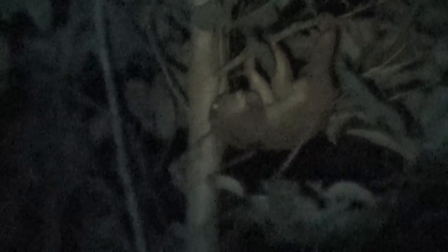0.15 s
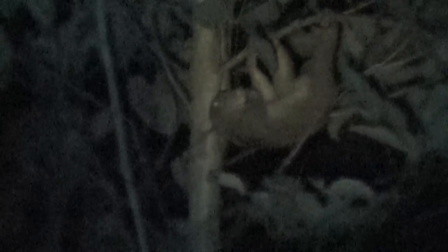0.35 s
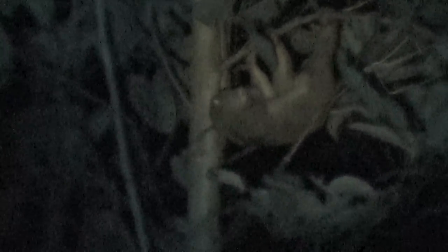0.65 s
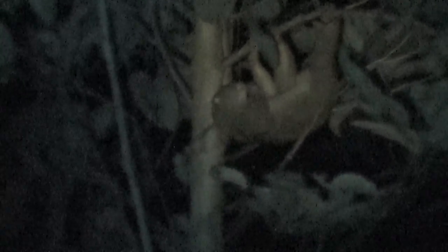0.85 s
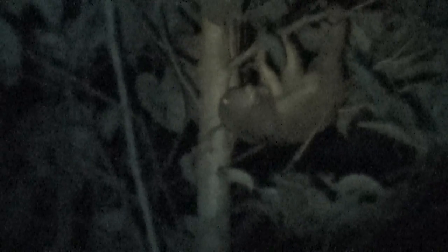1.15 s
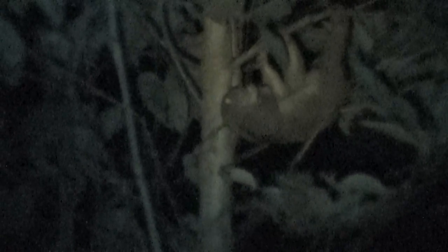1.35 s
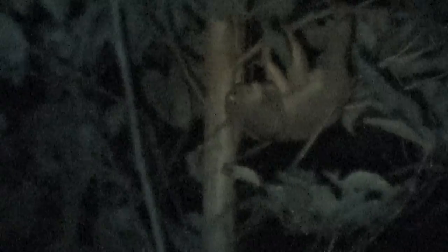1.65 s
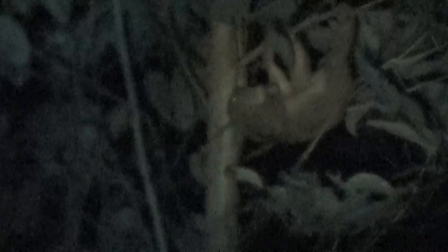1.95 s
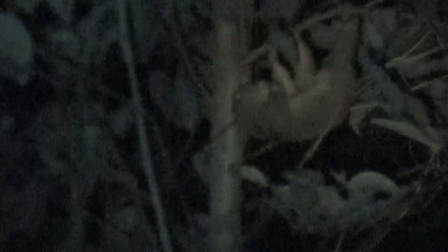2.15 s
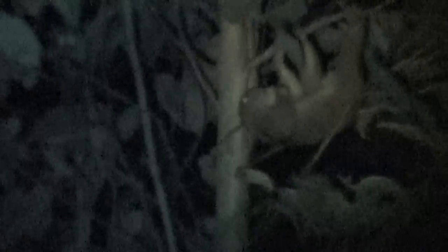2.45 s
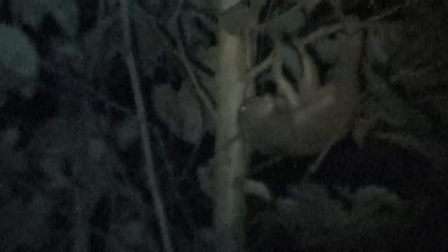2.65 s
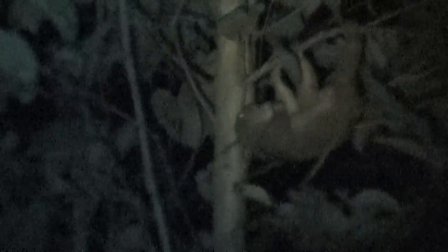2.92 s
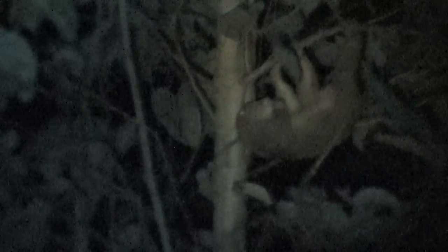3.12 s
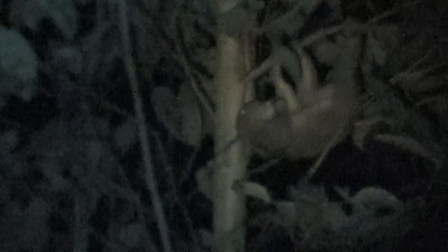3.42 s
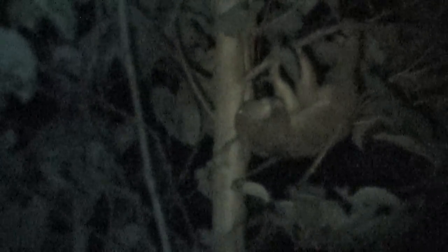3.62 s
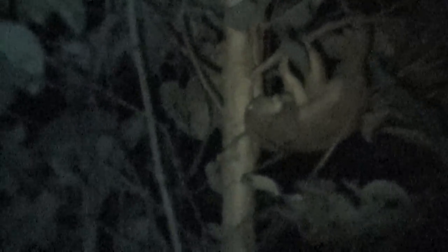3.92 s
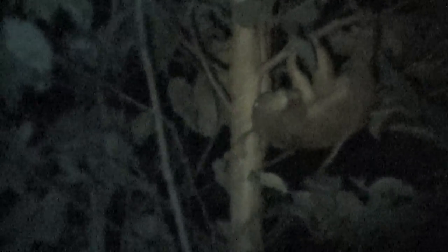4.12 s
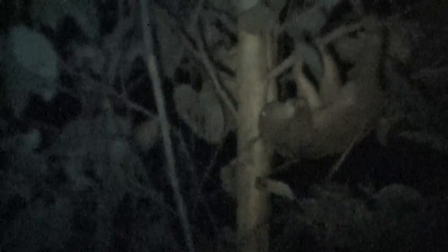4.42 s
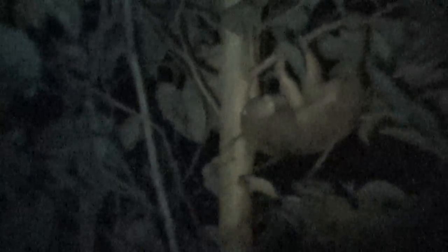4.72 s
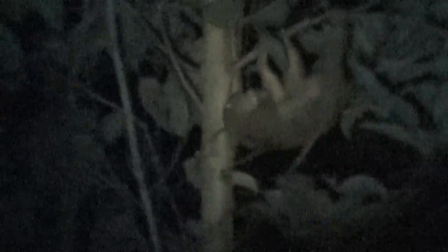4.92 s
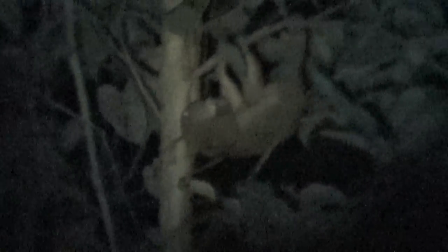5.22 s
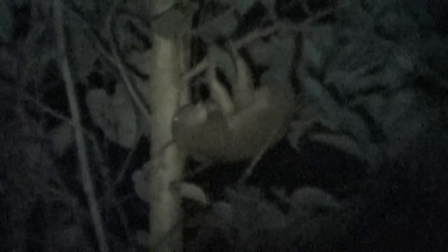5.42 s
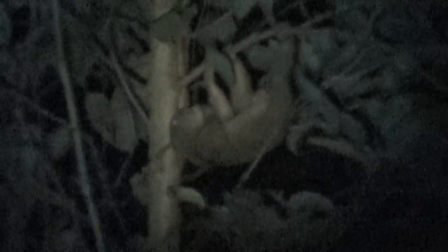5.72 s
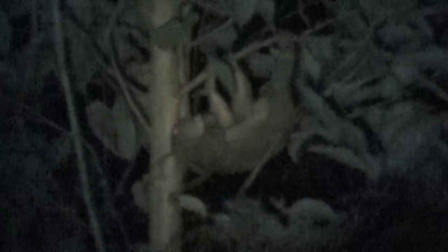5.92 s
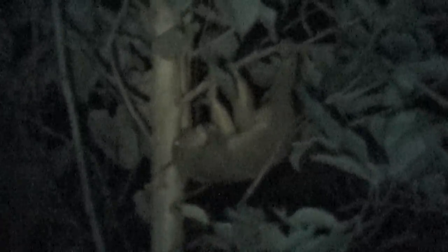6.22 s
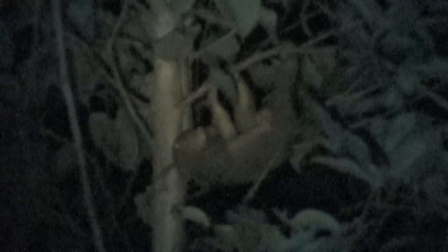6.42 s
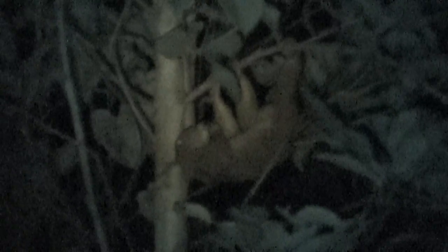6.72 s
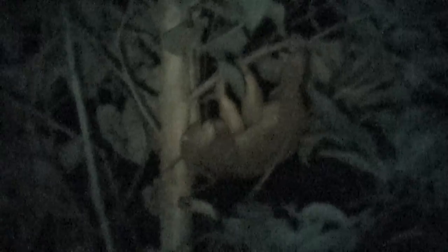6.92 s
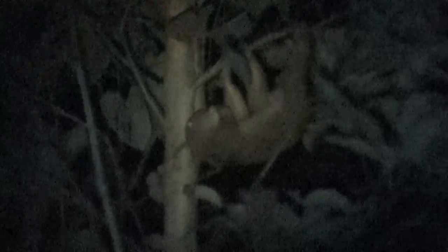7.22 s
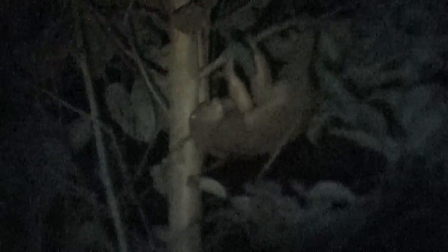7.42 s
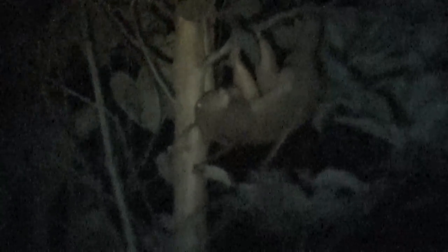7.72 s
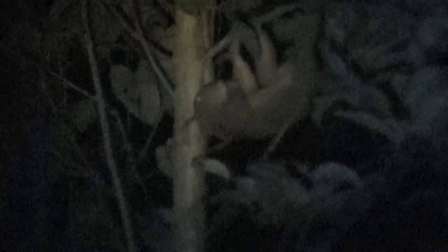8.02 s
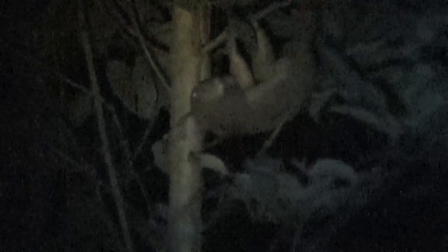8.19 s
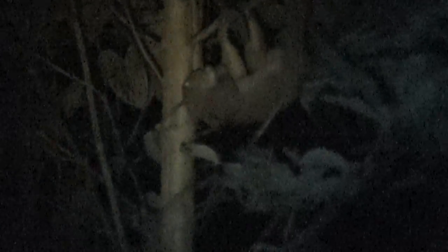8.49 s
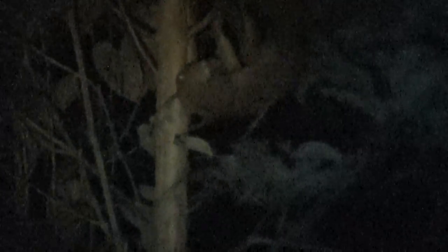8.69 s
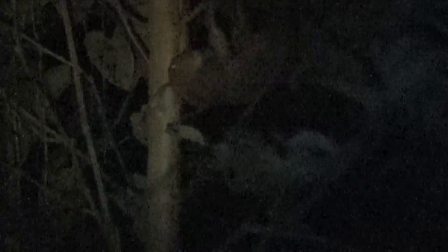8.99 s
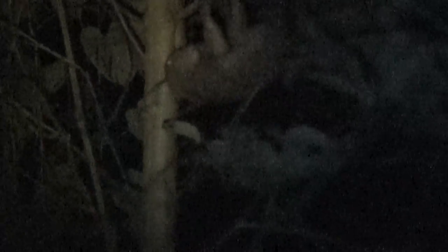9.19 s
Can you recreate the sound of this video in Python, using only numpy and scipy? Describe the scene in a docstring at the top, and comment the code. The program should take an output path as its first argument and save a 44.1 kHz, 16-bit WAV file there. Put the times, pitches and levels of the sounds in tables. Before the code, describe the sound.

Night rainforest: clear high frog peeps and quick two-part whistles from left and right, above layered cricket trills and fine insect rasping.

```python
"""Tropical forest at night

Small frogs peep in bouts and give two-part whistles, made of near sines that glide in pitch.
A near cricket trills with short pauses, one further off never stops, and two more buzz and rest.
A high katydid rasps in shaped noise, thin insects tick and chirp, and far frogs whistle softly.
Throbbing noise bands make the distant chorus, over faint air; trunks and leaves scatter many calls."""
import sys
import numpy as np
from scipy import signal
from scipy.fft import rfft, irfft, next_fast_len
from scipy.io import wavfile

SR = 44100
rng = np.random.default_rng(int(sys.argv[2]) if len(sys.argv) > 2 else 0)


def materialize(psi):
    """Save the field psi as 16-bit PCM at rate SR to the path in sys.argv[1].

    A 1-D psi becomes a single channel; in a 2-D psi each row is a channel.
    """
    bounded = np.clip(np.atleast_2d(psi).T, -1, 1)
    quanta = np.round(bounded * 32767).astype(np.int16)
    wavfile.write(sys.argv[1], SR, quanta)


N = 412335


def undb(db):
    """Turn decibels into a gain."""
    return 10 ** (np.asarray(db) / 20)


def level(x, db):
    """Scale a sound to an average (rms) level in dB."""
    return x * undb(db) / np.sqrt(np.mean(x ** 2))


def clock(seconds=None):
    """Sample times of a short sound, or of the whole scene."""
    return np.arange(N if seconds is None else int(seconds * SR)) / SR


def pan(db):
    """Left and right gains that differ by this many dB; above zero is left."""
    return undb(np.array([[db], [-db]]) / 2)


def add(out, s, x):
    """Mix a sound in, starting at s seconds."""
    i = int(s * SR)
    a, b = max(i, 0), min(i + x.shape[-1], N)
    if b > a:
        out[..., a:b] += x[..., a - i:b - i]


def walk(rate):
    """Random drift with a spread near 1, through `rate` new points per second."""
    points = rng.standard_normal(1024)
    # joining points by straight lines shrinks the spread; the factor restores it
    return np.sqrt(1.5) * np.interp(clock() * rate, np.arange(len(points)), points)


def noise(gain, side_db, comb_db=1.9):
    """Stereo noise shaped by gain(Hz), with a fixed random ripple that is deepest in the treble."""
    size = next_fast_len(N, True)
    f = np.arange(size // 2 + 1) * SR / size
    teeth = np.linspace(0, SR / 2, 700)
    ripple = np.interp(f, teeth, rng.standard_normal(len(teeth)))
    comb = undb(comb_db * f / 6000 * ripple)
    spectrum = rfft(rng.standard_normal((2, size))) * gain(f) * comb
    mid, side = irfft(spectrum, size)[:, :N]
    return level(mid + undb(side_db) * side * np.array([[1], [-1]]), 0)


def bell(hz, spread_hz):
    """A bell-shaped band around one pitch."""
    return lambda f: np.exp(-((f - hz) / (2 * spread_hz)) ** 2)


def colour(points):
    """A spectrum drawn through (frequency, level) points."""
    hz, db = np.transpose(points)
    return lambda f: undb(np.interp(np.log(f + 1), np.log(hz), db, left=-90, right=-90))


def swell(u, attack, release):
    """Smooth rise and fall while u runs from 0 to 1."""
    return np.sin(np.pi / 2 * np.clip(np.minimum(u / attack, (1 - u) / release), 0, 1)) ** 2


def whistle(hz, overtone_db):
    """A near sine that follows a pitch curve, with a weak octave above."""
    phase = 2 * np.pi * np.cumsum(hz) / SR
    return np.sin(phase) + undb(overtone_db) * np.sin(2 * phase)


def forest(x, t60, side_db):
    """Dense scatter from trunks and leaves: a noisy echo that builds up, then falls 60 dB in t60 s."""
    t = clock(1)
    fade = np.exp(-np.log(1000) * t / t60) * (1 - np.exp(-t / .012))
    mid, side = rng.standard_normal((2, len(t))) * fade
    echo = mid + undb(side_db) * side * np.array([[1], [-1]])
    unit_echo = echo / np.sqrt(np.sum(echo ** 2) / 2)
    return signal.fftconvolve(x[None], unit_echo, axes=1)[:, :N]


def peep(hz, length, rise_hz=62, crest=0.72):
    """One note that starts briskly, arches up to its pitch and flutters a little in level."""
    u = clock(length) / length
    flutter = undb(.8 * np.interp(u, np.linspace(0, 1, 12), rng.standard_normal(12)))
    shape = swell(u, attack=.19, release=.24) * flutter
    return whistle(hz - rise_hz * (1 - u / crest) ** 2, overtone_db=-29.5) * shape


# the peeping frogs, by name: (warm pitch [Hz], warm level [dB], warm peep length [s],
# left minus right [dB])
FROGS = {"high": (4461, -23.7, 0.0831, 6.5), "right": (4341, -23.6, .097, -6),
         "left": (4303, -28.7, 0.0953, 8), "far right": (4343, -27.6, .1, -9.5),
         "far": (4432, -30.5, .1, -1), "farthest": (4440, -38.5, .09, -1)}
# bouts of peeps: (frog name, cold at the start [0-1], list of peep times [s])
BOUTS = [("far right", 0, [.076, .355]), ("high", .3, [.186, .484]), ("farthest", 0, [.784, 1.065]),
         ("far", .7, [1.856, 2.145, 2.403, 2.652]), ("left", .7, [2.261, 2.575, 2.868, 3.137, 3.413]),
         ("high", 0.49, [2.468, 2.775, 3.062, 3.386, 3.715]), ("right", .9, [4.005, 4.298, 4.592, 4.884]),
         ("far", 0, [5.214, 5.472, 5.734]), ("high", 0.93, [5.645, 5.911, 6.192, 6.484, 6.838]),
         ("right", .3, [6.803, 7.129, 7.434, 7.718, 7.993]), ("far", .5, [7.93, 8.281, 8.551, 8.818]),
         ("left", .2, [8.355, 8.604, 8.9, 9.163]), ("high", 0.68, [8.909, 9.247])]
# a cold frog calls lower, softer and shorter (as a share); each peep leaves a share of the cold
COLD_HZ, COLD_DB, COLD_SHORTER, COLD_LEFT = 85, -5, 0.38, 0.21
# a soft, lower lead-in comes before every peep
LEAD_S, LEAD_LENGTH_S, LEAD_DROP_HZ, LEAD_DB = .04, .055, 70, -16


def peeping_frogs(near_db=-23, leaves_db=-14, echo_db=-23, wet_slope=1.4):
    """Each frog warms up through a bout; the softer it is, the more leaves scatter its call."""
    direct, scattered = np.zeros((2, N)), np.zeros(N)
    for frog, cold, onsets in BOUTS:
        hz, db, length, pan_db = FROGS[frog]
        wet = undb(min(leaves_db + wet_slope * (near_db - db), 0))
        for s in onsets:
            pitch = hz - COLD_HZ * cold
            # direct and scattered sound share the call's power
            gain = undb(db + COLD_DB * cold) / np.hypot(1, wet)
            lead = peep(pitch - LEAD_DROP_HZ, LEAD_LENGTH_S) * undb(LEAD_DB)
            main = peep(pitch, length * (1 - COLD_SHORTER * cold))
            for start, note in ((s - LEAD_S, lead), (s, main)):
                add(direct, start, note * gain * pan(pan_db))
                add(scattered, start, note * gain * wet)
            cold *= COLD_LEFT
    leaves = forest(scattered, t60=0.23, side_db=-15)
    echo = undb(echo_db) * forest(direct.mean(axis=0), t60=0.19, side_db=-12)
    return direct + leaves + echo


# runs of a frog whose whistle steps up partway: (first call [s], last call [s], level [dB])
TWO_PART_RUNS = [(.335, 1.682, -35.5), (1.926, 2.2, -41), (2.42, 4.445, -34.2), (4.838, 7.89, -34.5),
                 (8.272, 9.287, -34.2)]
TWO_PART_PERIOD_S = .339  # about; calls are spaced to fill each run evenly


def two_part_frog(first_hz=4048, second_hz=4108, length=0.107, step=0.37):
    """A soft first note dips in level and slides into a second, higher one."""
    out, u = np.zeros(N), clock(length) / length
    upper = .5 + .5 * np.tanh((u - step) / .07)  # 0 on the first note, 1 on the second
    part_db = -4 * (1 - upper) - 24 * upper * (1 - upper)
    shape = swell(u, attack=.15, release=.25) * undb(part_db)
    note = whistle(first_hz + (second_hz - first_hz) * upper, overtone_db=-35) * shape
    for first, last, db in TWO_PART_RUNS:
        for s in np.linspace(first, last, round((last - first) / TWO_PART_PERIOD_S) + 1):
            add(out, s, note * undb(db + .7 * rng.standard_normal()))
    return out * pan(3.1) + undb(-6) * forest(out, t60=0.49, side_db=-20)


# runs of the near cricket: (first pulse [s], last pulse [s])
TRILL_RUNS = [(.001, .923), (1.09, 3.558), (3.799, 5.726), (5.882, 8.079), (8.247, 9.339)]
# one stroke of its wing: (share of the stroke [0-1], pitch before wobble [Hz], relative level [dB])
STROKE = [(0, 6730, -28), (.1, 6460, -6.5), (.32, 6262, -5.5), (.44, 6188, 1), (.55, 6080, -10),
          (.88, 5820, -5.2), (1, 5500, -20)]
# leaves that mirror it: (lag [s], level against the wing [dB], left minus right [dB])
LEAVES = [(.0037, -9, 4), (.0107, -8.5, 6), (0.014, -17.5, 1)]
# it eases into each run from a softer start
RUN_START_DB, RUN_EASE_S = -5, .04


def near_cricket(length=.0205, lead=.0096, db=-35.8):
    """Each wing stroke slows as it closes, so its tone falls; nearby leaves repeat it."""
    stroke_rate = 33.65  # about, per second
    wing, u = np.zeros(N), clock(length) / length
    share, hz, stroke_db = np.transpose(STROKE)
    for first, last in TRILL_RUNS:
        for s in np.linspace(first, last, round((last - first) * stroke_rate) + 1):
            late, *grip = rng.standard_normal(9)
            # the file catches unevenly; this bends the pitch more as the wing slows
            catch = np.interp(u, np.linspace(0, 1, len(grip)), grip)
            pitch = np.interp(u, share, hz) + 110 * u ** 2 * catch
            tone = whistle(pitch, overtone_db=-42)
            effort_db = RUN_START_DB * np.exp((first - s) / RUN_EASE_S)
            gain = undb(np.interp(u, share, stroke_db) + effort_db + 1.1 * catch)
            add(wing, s - lead + .000018 * late, tone * gain)
    out = wing * pan(7.4) + undb(-4.5) * forest(wing, t60=0.07, side_db=-2.5)
    for lag, leaf_db, pan_db in LEAVES:
        add(out, lag, wing * undb(leaf_db) * pan(pan_db))
    return level(out, db)


def low_cricket(hz=2290, fall_hz=120, scatter_hz=30, length=0.026, db=-44):
    """A tree cricket further off: an unbroken trill of soft, slightly falling pulses."""
    stroke_rate = 32.4  # per second
    out, u = np.zeros(N), clock(length) / length
    shape = swell(u, attack=0.33, release=0.55)
    for k, (late, pitch) in enumerate(rng.standard_normal((int(stroke_rate * N / SR) + 1, 2))):
        pulse = whistle(hz + scatter_hz * pitch - fall_hz * (u - .5), overtone_db=-45) * shape
        add(out, k / stroke_rate + .0004 * late, pulse)
    return level(out * pan(-3.5) + undb(-4.5) * forest(out, t60=0.23, side_db=-24), db)


# two crickets that buzz and rest: (pitch [Hz], fall in a pulse [Hz], level while buzzing [dB],
# pulse rate [per s], list of runs (start [s], end [s]))
BUZZERS = [(4965, 600, -46, 72.3, [(-.1, 1.18), (1.62, 2.6), (3.02, 4.2), (4.52, 6.1), (6.42, 7.3),
           (7.62, 8.2), (8.35, 9.1)]), (5370, 420, -43.5, 80.8, [(-.1, 0.89), (1.6, 2.51), (2.92, 4.2),
           (4.68, 6.25), (6.8, 7.9), (8.4, 9.5)])]


def buzzing_crickets(fade_s=.1, waver_hz=70, t60=.09, direct_db=-3):
    """Fast wing pulses, each falling in pitch, come in runs and are blurred by leaves."""
    out, t = 0, clock()
    for hz, fall_hz, db, rate, runs in BUZZERS:
        playing = 0
        for a, b in runs:
            fade = fade_s / (b - a)
            playing = playing + swell((t - a) / (b - a), attack=fade, release=fade)
        u = (rate * t + .12 * walk(3)) % 1  # place within the pulse
        cycles = (hz + waver_hz * walk(60) + fall_hz * (1 - u) / 2) * u / rate
        wing = np.sin(2 * np.pi * cycles) * swell(u, attack=.3, release=.45)
        blurred = undb(direct_db) * wing + forest(wing, t60=t60, side_db=-12)
        out = out + level(blurred, db) * playing
    return out


# resonances of the katydid's wing: (centre [Hz], spread [Hz], relative level [dB])
KATYDID = [(9910, 330, -8), (11184, 190, -.5), (11880, 280, -3.5), (12600, 104, 4), (13100, 210, -2.5),
           (14070, 450, -4), (15000, 110, -4), (15550, 130, -5)]
KATYDID_SKIP_S = 5.61  # the rasp dips briefly around this time


def katydid(sharpness=2.8, steady=1.0, db=-49.5):
    """A file rings the wing on every stroke: noise in the wing's bands, pulsing over a steady rasp."""
    stroke_rate = 46.3  # per second
    t = clock()
    phase = stroke_rate * t + 0.062 * walk(11)
    strokes = steady + np.exp(sharpness * (np.cos(2 * np.pi * (phase - .55)) - 1))
    playing = 1 - .7 * np.exp(-((t - KATYDID_SKIP_S) / .022) ** 4)

    def resonances(f):
        """The wing's bands added together."""
        return sum(undb(peak_db) * bell(hz, spread_hz)(f) for hz, spread_hz, peak_db in KATYDID)

    wing = noise(resonances, side_db=-31)
    return level(wing * strokes * playing * undb(0.25 * walk(3)), db)


# bouts of a thin, high ticking insect: (start [s], end [s])
TICK_BOUTS = [(0, 1.65), (3.45, 5.08), (6.9, 8.9)]
# a slowly chirping cricket: (time [s], level [dB])
CHIRPER = [(0, -47.5), (2.7, -48.5), (2.95, -61), (9.35, -57)]


def small_insects(tick_hz=9400, tick_db=-55.5, chirp_hz=7210):
    """Pulsed narrow noise: thin ticking in bouts, and one cricket's slow, even chirps."""
    tick_rate, chirp_rate = 14.1, 2.345  # per second
    t = clock()
    bouts = sum(swell((t - a) / (b - a), attack=0.045, release=0.024) for a, b in TICK_BOUTS)
    tick_place = (tick_rate * t + 0.32 * walk(1.3)) % 1
    ticks = bouts * swell(tick_place, attack=0.14, release=0.56) ** 2
    chirp_place = ((chirp_rate * t + 0.035) % 1) / 0.61  # silent above 1
    chirp_gain = undb(np.interp(t, *np.transpose(CHIRPER)))
    chirps = swell(chirp_place, attack=0.13, release=0.29) * chirp_gain
    ticking = undb(tick_db) * ticks * noise(bell(tick_hz, 100), side_db=-1.5) * pan(3.5)
    return ticking + chirps * noise(bell(chirp_hz, 60), side_db=-28)


# a far falling whistle comes at an even pace
FALLING_FIRST_S, FALLING_PERIOD_S, FALLING_DB = .695, 1.332, -43
# crowds of far frogs: (mean pitch [Hz], pitch spread [Hz], glide [Hz], length [s],
# typical level [dB], call rate [per s])
CROWDS = [(3609, 29.4, 78, 0.1454, -48, 7), (3474, 28.9, -79, 0.192, -51, 3.5),
          (4337, 75.8, 51, 0.089, -41.5, 6)]


def far_frogs(high_hz=3480, low_hz=3350, length=0.204):
    """One long falling whistle, and crowds of short gliding ones, blurred by the forest."""
    out, u = np.zeros(N), clock(length) / length
    falling = whistle(high_hz + (low_hz - high_hz) * u, overtone_db=-37)
    falling = falling * swell(u, attack=0.26, release=0.32) * undb(FALLING_DB)
    for s in np.arange(FALLING_FIRST_S, N / SR, FALLING_PERIOD_S):
        add(out, s, falling)
    for hz, spread_hz, glide_hz, seconds, db, rate in CROWDS:
        u = clock(seconds) / seconds
        shape = swell(u, attack=0.36, release=0.26)
        for k, (late, pitch, size) in enumerate(rng.standard_normal(size=(90, 3))):
            glide = hz + spread_hz * pitch + glide_hz * (u - .5)
            note = whistle(glide, overtone_db=-45) * shape
            add(out, (k + .35 * late) / rate, note * undb(db + 2 * size))
    return undb(1.5) * out + undb(-4) * forest(out, t60=0.84, side_db=-17)


# distant insects and frogs: (centre [Hz], spread [Hz], level [dB], pulse rate [per s],
# pulse depth [0-1], left minus right [dB])
CHORUS = [(1843, 69, -61.5, 31, 0.1, 0), (2296, 81, -47, 32.4, 0.45, -1.5), (2324, 102, -52, 32, 0.15, -1),
          (3060, 97, -49.5, 12, 0.1, -1), (3430, 68, -51, 19, 0.18, 1), (3602, 89, -53.5, 23, 0.3, 0.5),
          (4260, 122, -46.5, 3.3, 0.16, 0), (5150, 290, -44.5, 41, 0.09, -0.5), (5950, 230, -48, 34, .1, 0),
          (7000, 200, -51.5, 52.5, 0.3, 3), (7683, 166, -51.5, 5.4, 0.15, -0.5),
          (8960, 590, -61, 3, 0.05, -5)]


def chorus():
    """Many far callers of each kind merge into a noise band that throbs at their pulse rate."""
    out = 0
    for hz, spread_hz, db, rate, depth, pan_db in CHORUS:
        throb = 1 + depth * np.cos(2 * np.pi * (rate * clock() + 0.17 * walk(4)))
        # high tones differ more between left and right
        band = noise(bell(hz, spread_hz), side_db=min(-24 + 10 * np.log2(hz / 2300), -10))
        out = out + level(band * throb * undb(.5 * walk(3.18)), db) * pan(pan_db)
    return out


# spectrum of still air and far rumble: (frequency [Hz], relative level [dB])
AIR = [(12, -45), (22, -11), (43, -9), (59, -3), (75, -2.5), (102, -0.5), (177, -4), (286, -0.5), (468, -3),
       (797, -1.5), (1600, -8.5), (2080, -27), (3520, -120)]
AIR_DB = -64.5
# a faint drip on a leaf and a soft bump: (time [s], centre [Hz], spread [Hz],
# starting level [dB], decay [s])
TAPS = [(.534, 1200, 300, -52.5, .009), (4.35, 150, 70, -60, .03)]


def background(hum_hz=75, hum_db=-77, hiss_db=-66, rush_db=-74):
    """Shaped noise: faint air, a diffuse low rush, a wavering far hum, thin hiss and two small taps."""
    out = level(noise(colour(AIR), side_db=-20) * undb(.3 * walk(2.98)), AIR_DB)
    out += undb(rush_db) * noise(bell(395, 150), side_db=-8) * pan(2)
    out += undb(hum_db) * noise(bell(hum_hz, 2.6), side_db=-20)  # so narrow that it wavers
    out += undb(hiss_db) * noise(bell(8400, 3300), side_db=-40)
    t = clock(0.22)
    for s, hz, spread_hz, db, decay in TAPS:
        burst = noise(bell(hz, spread_hz), side_db=-27)[:, :len(t)]
        add(out, s, burst * undb(db) * np.exp(-t / decay))
    return out


def scene():
    """All callers over the quiet forest."""
    frogs = peeping_frogs() + two_part_frog() + far_frogs()
    insects = near_cricket() + low_cricket() + buzzing_crickets() + katydid() + small_insects()
    return frogs + insects + chorus() + background()


TOP_HZ = 15800


def record(dry):
    """The recorder cuts the top: a steep low-pass filter removes the treble above TOP_HZ."""
    return signal.sosfilt(signal.ellip(12, .1, 80, TOP_HZ, fs=SR, output="sos"), dry)


dry = scene()
out = record(dry)
materialize(out)
```